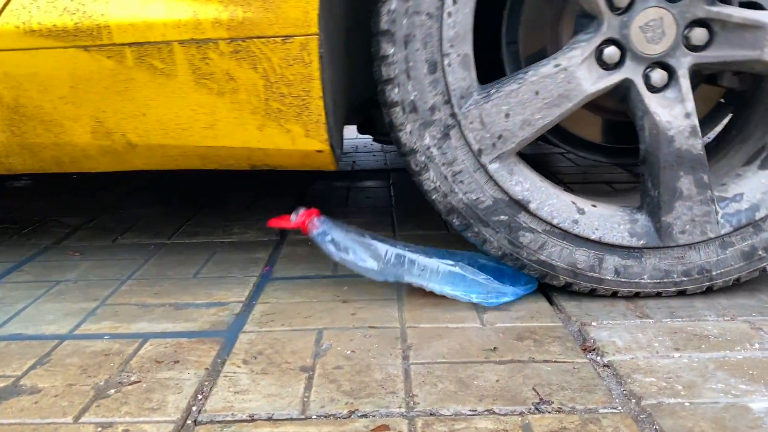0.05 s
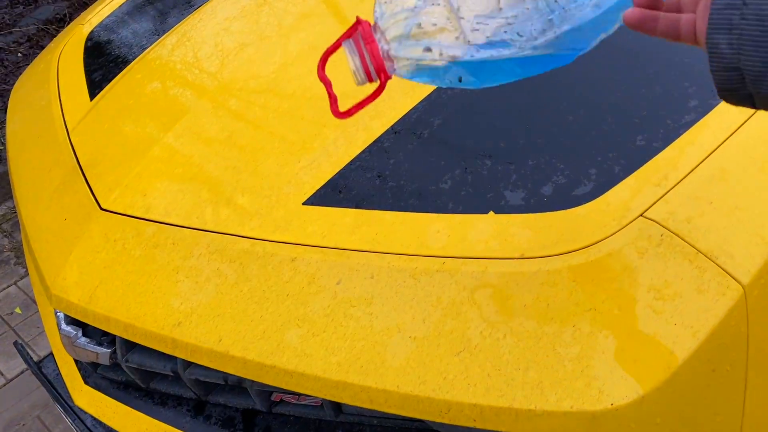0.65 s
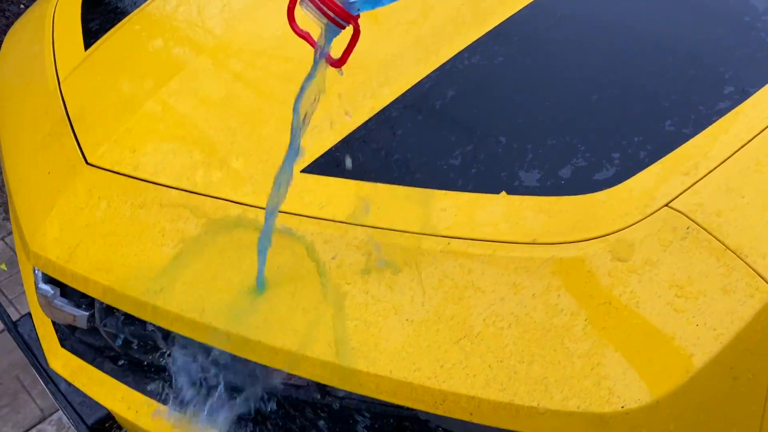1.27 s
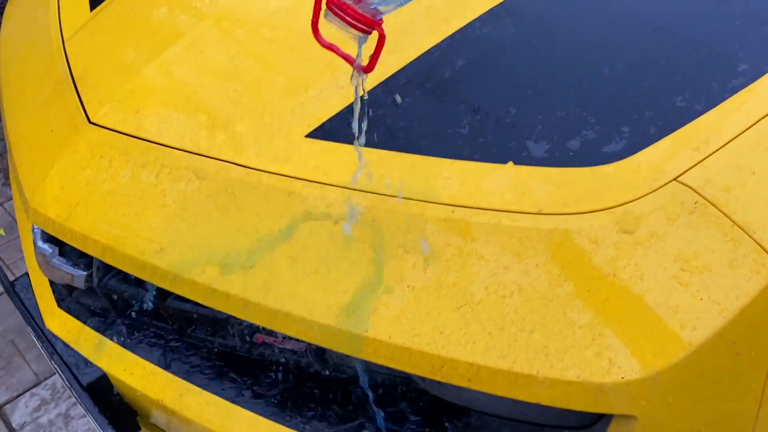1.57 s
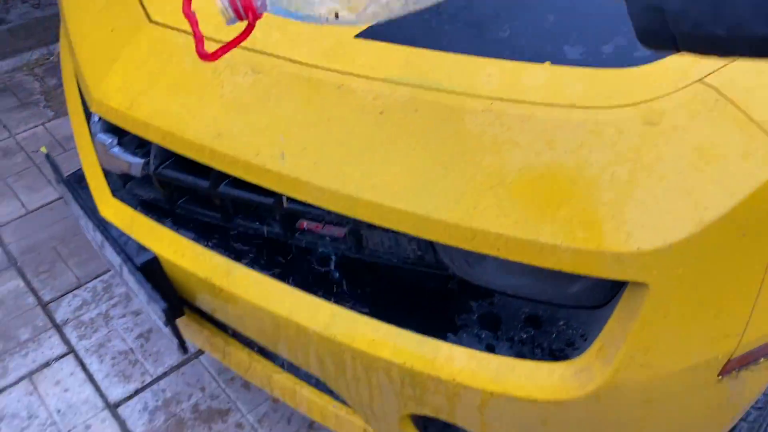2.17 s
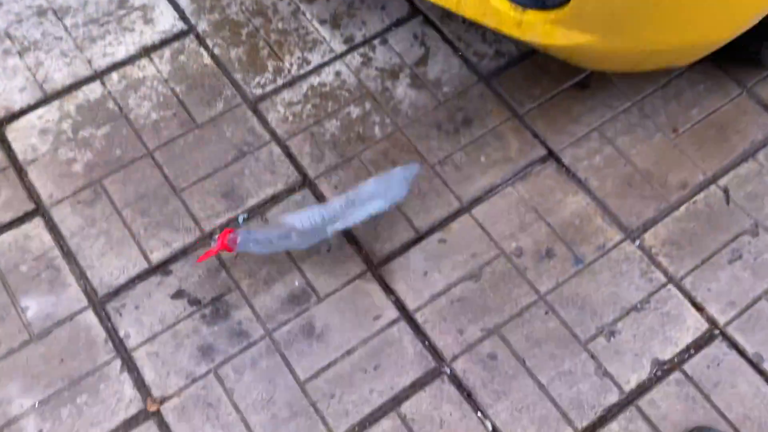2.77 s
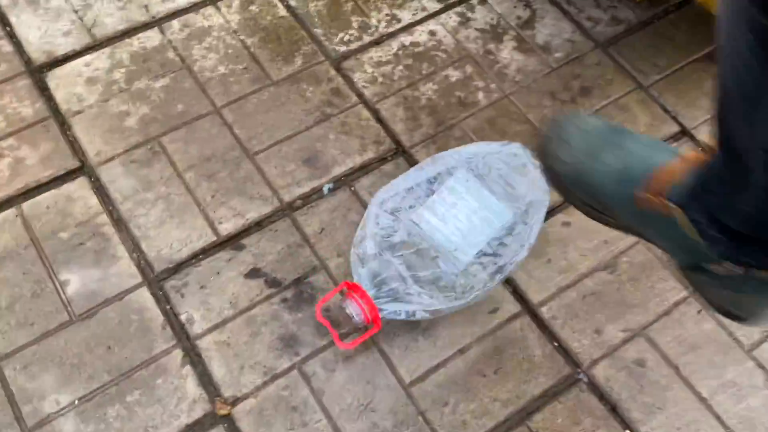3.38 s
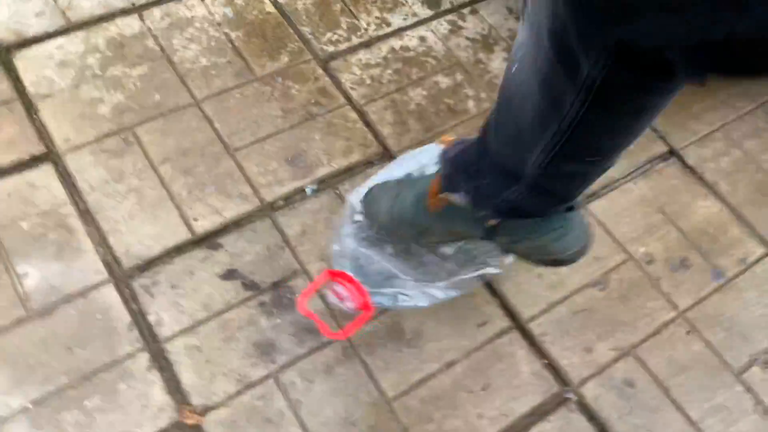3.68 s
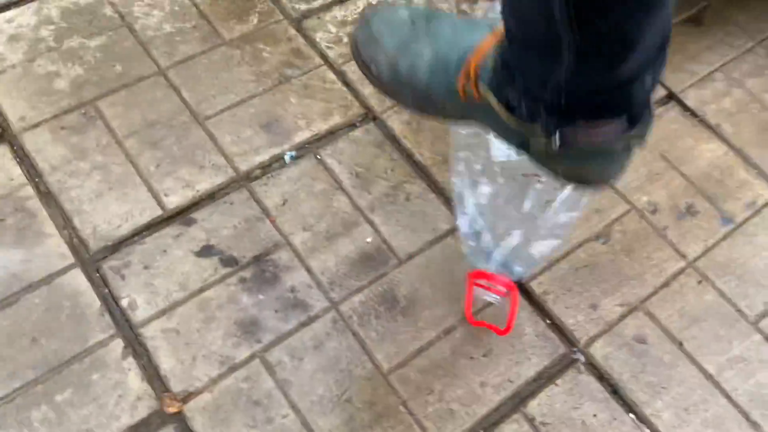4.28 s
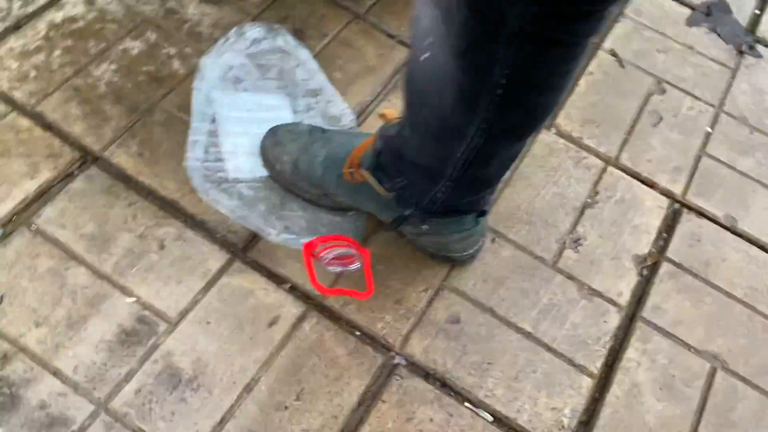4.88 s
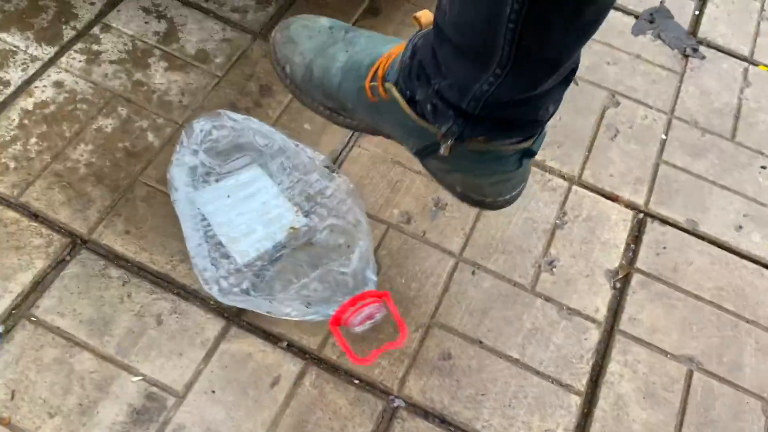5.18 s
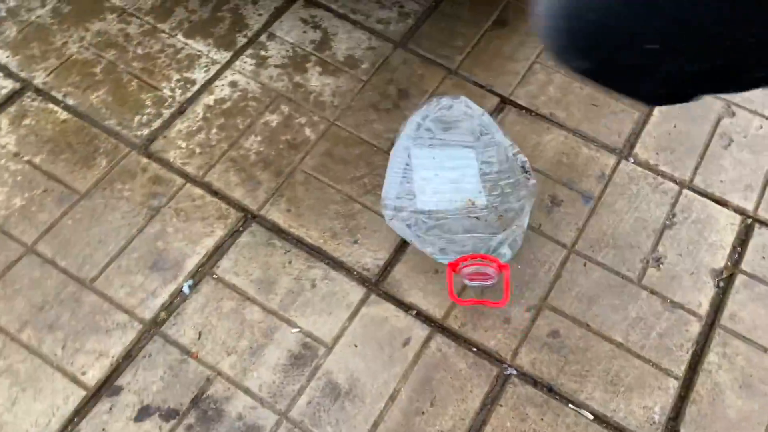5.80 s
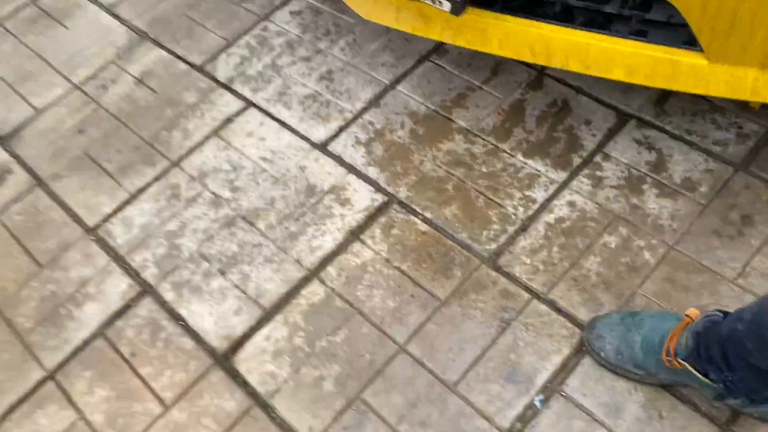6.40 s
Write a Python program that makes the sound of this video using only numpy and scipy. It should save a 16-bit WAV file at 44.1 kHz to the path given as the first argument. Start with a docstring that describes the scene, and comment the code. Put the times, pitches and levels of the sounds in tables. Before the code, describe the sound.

A big empty plastic bottle springs out from under a car tyre with hollow pops over a low steady noise. In a quieter yard, liquid sloshes, then pours and drums on a car bonnet with spray and drips. The bottle drops onto wet paving and is stomped about six times, each a loud crunch over a thud, with snaps, crinkles and scuffing steps between. Faint wind rumbles on the microphone.

```python
"""Hollow pops: a big empty plastic bottle springs out from under a car tyre. The background drops to a
quiet yard. Liquid sloshes in the bottle, then pours out and drums on the car's bonnet with spray and drops.
The bottle is dropped on wet paving and stomped flat amid dull, wet footsteps: each stomp is a rush of
buckling folds over a thud, and the wall snaps back as the boot scuffs off it.
Air rumbles on two closely spaced microphone ports."""
import sys
import numpy as np
from scipy import signal
from scipy.fft import rfft, irfft, next_fast_len
from scipy.io import wavfile
from scipy.ndimage import uniform_filter1d, minimum_filter1d, map_coordinates

SR = 44100
rng = np.random.default_rng(int(sys.argv[2]) if len(sys.argv) > 2 else 0)


def persist_wave(psi):
    """Save psi, clipped to +-1, as 16-bit WAV."""
    counts = np.round(np.clip(psi, -1, 1) * 32767).astype(np.int16)
    wavfile.write(sys.argv[1], SR, np.atleast_2d(counts).T)


N = 293265
BLOW = 8192  # samples per impact
TIME_S, BLOW_S = np.arange(N) / SR, np.arange(BLOW) / SR
CRACK_S = 0.0025  # rms window for a crack's level


def amp(db):
    return 10 ** (np.asarray(db) / 20)


def unit(x):
    return x / np.sqrt(np.mean(x ** 2) + 1e-20)


def at_hz(points, hz):
    """Interpolate on a log frequency axis."""
    f, values = np.transpose(points)
    return np.interp(np.log(hz + 1), np.log(f + 1), values)


def at_time(points, s):
    return np.interp(s, *np.transpose(points))


def wobble(rate_hz):
    """Smooth random curve."""
    return map_coordinates(rng.standard_normal(int(N * rate_hz / SR) + 4), [TIME_S * rate_hz])


def filtered(x, response):
    """Apply a complex frequency response."""
    size = x.shape[-1]
    padded = next_fast_len(size + BLOW)
    return irfft(rfft(x, padded) * response(np.fft.rfftfreq(padded, 1 / SR)), padded)[..., :size]


def minimum_phase(db):
    cepstrum = irfft(np.log(amp(db)))
    half = cepstrum.shape[-1] // 2
    cepstrum[..., 1:half] *= 2
    cepstrum[..., half + 1:] = 0
    return np.exp(rfft(cepstrum))


def add(track, s, x):
    start = max(round(s * SR), 0)
    track[:, start:start + x.shape[1]] += x[:, :N - start]


# Port likeness: f/Hz, left-right coherence/1
PORT_COHERENCE = [(60, .92), (150, .96), (350, .95), (650, .88), (1100, .78), (1700, .88), (2100, .62),
                  (3300, .62), (6000, .5), (7500, .4), (9000, .8), (16000, .85)]
# Port balance: f/Hz, left minus right/dB
PORT_BALANCE = [(60, -1), (200, -3), (350, -4.5), (650, 4.5), (950, 3), (1300, 5.5), (1800, -3.5),
                (2200, 5.5), (3500, 1), (5300, 4.5), (7500, 0), (15000, 1)]
# Port phase: f/Hz, left lead/rad
PORT_LEAD = [(150, 0), (350, .3), (500, .8), (780, 1.1), (1100, .3), (1550, -.1), (2000, .9), (5000, 1.2),
             (5800, -.5), (7200, -.5), (8000, -3.1), (10900, -6.3), (13400, -9.4), (16000, -12.5)]


def ports(pair):
    """Two independent signals become left and right at closely spaced ports."""
    def blend(hz):
        angle = np.arccos(np.clip(at_hz(PORT_COHERENCE, hz), 0, 1)) / 2
        return np.array([np.cos(angle), np.sin(angle)])

    def steer(hz):
        left = amp(at_hz(PORT_BALANCE, hz) / 2) * np.exp(.5j * at_hz(PORT_LEAD, hz))
        return np.array([left, 1 / left])

    mid, side = filtered(pair, blend)
    return filtered(np.array([mid + side, mid - side]), steer)


def coloured(pair, spectrum):
    """Shaped stereo signal, rms 1."""
    return unit(ports(filtered(pair, lambda hz: amp(at_hz(spectrum, hz)))))


def noise(spectrum):
    return coloured(rng.standard_normal((2, N)), spectrum)


def ticks(size, per_s, spread_db, bed):
    """Uneven random impulses on a noise bed."""
    hit = rng.random(size) < per_s / SR
    strength = amp(spread_db * np.minimum(rng.standard_normal(size), 2))
    return unit(hit * strength * rng.standard_normal((2, size))) + bed * rng.standard_normal((2, size))


def grains(per_s, cycles, spread_db, low_hz=900, span_hz=14000, size=256):
    """Damped sine ticks of random pitch, strength, time and direction."""
    pitch, strength, onset, direction = rng.random((int(per_s * N / SR), 4)).T[:, :, None]
    t = np.arange(size) / SR
    hz = low_hz + span_hz * pitch ** 2
    tick = np.sin(2 * np.pi * hz * t) * np.exp(-hz * t / cycles)
    strength_db = spread_db * np.minimum(-np.log(1 - strength), np.e)
    tick *= amp(strength_db) * hz ** .75  # high ticks: shorter and rarer, so stronger
    where = ((onset * N).astype(int) + np.arange(size)).ravel()
    sides = np.cos(2 * np.pi * direction), np.sin(2 * np.pi * direction)
    return unit(np.array([np.bincount(where, (tick * gain).ravel(), N)[:N] for gain in sides]))


def damped(x, edge_hz=3500):
    """Plastic absorbs treble."""
    return unit(filtered(x, lambda hz: 1 / (1 + 1j * hz / edge_hz)))


def dispersed(x, lag_s=0.01082, corner_hz=172.7):
    """Low bending waves travel slower, so each crack falls in pitch."""
    return filtered(x, lambda hz: np.exp(-2j * np.pi * lag_s * corner_hz * np.log1p(hz / corner_hz)))


def tilt_db(hz, body_db, bright_db, top_db):
    """Small, bright sources trade bass for treble; large, dull ones lose their top."""
    bass_db = body_db + min(-.4 * bright_db, 7)
    tick_db = top_db + 1.28 * bright_db
    dull_db = min(bright_db, 0)
    return at_hz([(330, bass_db), (800, 0), (1850, 0), (2300, dull_db), (3500, bright_db),
                  (5500, bright_db + .6 * dull_db), (9500, tick_db + .6 * dull_db)], hz)


def flip(length_s, shiver_db=-20, shiver_t60_s=.045, rise_s=.0009):
    """Force of one fold flipping: a short crack, then the sheet's faint, duller shiver."""
    crack, shiver = rng.standard_normal((2, 2, BLOW))
    crack = amp(-60 * (BLOW_S / length_s) ** 1.5) * crack
    shiver = amp(shiver_db - 60 * BLOW_S / shiver_t60_s) * damped(shiver)
    return (1 - np.exp(-BLOW_S / rise_s)) * (crack + shiver)


# Wall spectrum: f/Hz, level/dB
WALL_SPECTRUM = [(40, -37.5), (100, -8.5), (170, 0.5), (330, -4), (480, -6.5), (900, -3.5), (1300, -4.5),
                 (1800, -1.5), (2100, -6.5), (2700, -7), (3600, -9), (6000, -15.5), (11000, -17.5),
                 (16000, -23)]
# Bottle resonances: f/Hz, width/Hz, level/dB
BOTTLE_MODES = [(347, 54, -3.5), (670, 830, 5.5), (944, 70, -5), (1830, 65, -4.5), (3960, 1100, -5)]


def bottle(force, window_s, db, body_db, bright_db, low_hz, dents_hz, dent_db=6.5, top_db=-1):
    """A force rings the bottle, its small facets and fresh dents; db is the rms over window_s."""
    detunes = np.exp(.03 * rng.standard_normal(len(BOTTLE_MODES)))
    facets_hz = np.geomspace(2800, 10000, 4) * 2 ** rng.uniform(-.3, .3, 4)
    modes = [(f * detune, width, level) for (f, width, level), detune in zip(BOTTLE_MODES, detunes)]
    modes += [(f, f / 11, 1) for f in facets_hz]
    modes += [(f, 48 + f / 23, dent_db) for f in dents_hz]
    modes = [(f, width, level + 3 * rng.standard_normal()) for f, width, level in modes]
    # fine structure from the force, broad colour from the wall
    force_power = np.abs(rfft(force, 2 * BLOW)) ** 2
    force_db = 10 * np.log10(np.abs(uniform_filter1d(force_power, size=160)) + 1e-12)

    def body(hz):
        peaks = sum(amp(level) ** 2 / (1 + (2 * (hz - f) / width) ** 2) for f, width, level in modes)
        low_shelf = amp(-18.5) ** 2 + 1 / (1 + (low_hz / (hz + 1)) ** 8)
        wall_db = at_hz(WALL_SPECTRUM, hz) + tilt_db(hz, body_db, bright_db, top_db)
        return minimum_phase(wall_db + 10 * np.log10((1 + 2 * peaks) * low_shelf) - force_db)

    ring = ports(filtered(force, body))
    rms = np.sqrt(np.mean(ring[:, :int(window_s * SR) + 1] ** 2))
    return amp(db) * dispersed(ring) / rms


# Panel pops: t/s, ring level/dB, f/Hz, crack level/dB
PANEL_POPS = [(0.0, -20, 452, -27.5), (0.0347, -22, 915, -22.5), (0.132, -34, 1157, -38),
              (0.216, -10.5, 577, -14), (0.306, -15.5, 455, -25), (0.809, -44.5, 1640, -44.5),
              (1.287, -34, 1914, -58), (1.604, -24, 1840, -24), (3.345, -39.5, 850, -48),
              (3.397, -34, 800, -51.5), (3.462, -32.5, 775, -35), (3.725, -36, 950, -28),
              (5.168, -51, 1100, -43.5), (5.581, -28, 997, -24.5), (5.774, -37, 1087, -42.5)]
# Panel modes: f/pitch, level/dB, t60/s
PANEL_MODES = [(.71, -26, 0.18), (0.999, 2.5, 0.052), (1.269, -4, 0.058), (1.96, -17, 0.11),
               (2.7, -16.5, 0.086), (3.15, -2, 0.021)]


def pops(edge_hz=2600, crack_length_s=0.0075, rise_s=0.00015):
    """Whole panels pop with a hollow pitch; the plastic mutes their highest modes."""
    out = np.zeros((2, N))
    for s, ring_db, pitch_hz, crack_db in PANEL_POPS:
        ring = 0
        for ratio, db, t60_s in PANEL_MODES:
            hz = pitch_hz * ratio
            tone = np.sin(2 * np.pi * (hz * BLOW_S + rng.random()))
            ring += amp(db - 60 * BLOW_S / t60_s) * tone / (1 + (hz / edge_hz) ** 4)
        crack = bottle(flip(crack_length_s), CRACK_S, crack_db, body_db=-4, bright_db=-3,
                       low_hz=pitch_hz / 2, dents_hz=[pitch_hz], top_db=-4)
        add(out, s, crack + amp(ring_db) * ring * (1 - np.exp(-BLOW_S / rise_s)))
    return out


# Background by the wheel: f/Hz, level/dB
WHEEL_SPECTRUM = [(24, -37), (40, -23), (155, 7), (204, -9.5), (663, -11), (831, -22), (918, -17),
                  (4800, -26.5), (5870, -27.5), (8550, -37), (11300, -32.5), (12500, -34), (13400, -43.5),
                  (16000, -72)]
# Open-air background: f/Hz, level/dB
YARD_SPECTRUM = [(71, -35), (120, 1), (278, -4.5), (341, -21.5), (463, -4.5), (670, -5.5), (968, -16),
                 (1070, -16.5), (2700, -26.5), (16000, -90)]


def background(wheel_db=-37.5, yard_db=-57.5, switch_s=0.4036, fade_s=0.0014):
    """The scene changes: steady noise by the wheel gives way at once to quieter yard noise."""
    by_wheel = np.clip((switch_s - TIME_S) / fade_s, 0, 1)
    wheel = by_wheel * amp(wheel_db) * noise(WHEEL_SPECTRUM)
    return wheel + (1 - by_wheel) * amp(yard_db) * noise(YARD_SPECTRUM)


# Air on the ports: t/s, level/dB
WIND_LEVEL = [(0.0, -44.5), (0.2, -45), (0.46, -52.5), (2.26, -50.5), (2.9, -41.5), (3.13, -44),
              (3.72, -51), (4.87, -55), (5.09, -62.5), (6.24, -48.5), (6.65, -63.5)]
# Wind rumble: f/Hz, level/dB
WIND_SPECTRUM = [(20, -48), (45, -1), (75, 0.5), (130, -8), (220, -20), (500, -52)]


def wind(gain_db=3.5, gust_db=2):
    """Moving air buffets the ports."""
    return amp(at_time(WIND_LEVEL, TIME_S) + gain_db + gust_db * wobble(17)) * noise(WIND_SPECTRUM)


# Liquid sloshing, then pouring: t/s, level/dB
LIQUID_FLOW = [(.65, -9.5), (.98, -12.5), (1.12, -4.5), (1.25, -3), (1.42, -0.5), (1.55, -5), (1.7, -6.5),
               (2.04, -10), (2.12, -14), (2.65, -13)]
# Slosh and drumming bonnet: f/Hz, level/dB
LIQUID_SPECTRUM = [(100, -4), (200, 0), (320, 1.5), (480, -3.5), (700, -4.5), (1000, -14), (1350, -15.5),
                   (1820, -17), (2200, -26), (3000, -23.5), (6000, -31), (12000, -54)]
# Spray and drops: f/Hz, level/dB
SPRAY_SPECTRUM = [(900, -4.5), (1800, -16.5), (3000, -7.5), (6000, -7), (9000, -3), (12000, 3),
                  (16000, -14)]


def slosh_and_pour(body_db=-42, spray_db=-44.5, spray_db_per_db=2.13, lag_s=0.028, lands_s=1):
    """Liquid sloshes in the bottle, then pours out and drums on the bonnet; more flow, more spray."""
    slaps = amp(2.5 * wobble(25)) * ticks(N, per_s=900, spread_db=2, bed=1)
    body = amp(body_db + at_time(LIQUID_FLOW, TIME_S)) * coloured(slaps, LIQUID_SPECTRUM)
    drops = grains(per_s=3200, cycles=2, spread_db=4)
    flutter_db = 2.5 * wobble(32.03)
    hiss = amp(-6) * rng.standard_normal((2, N))
    level_db = spray_db + spray_db_per_db * at_time(LIQUID_FLOW, TIME_S - lag_s) + flutter_db
    onset = np.clip((TIME_S - lands_s) / 0.078, 0, 1)
    spray = onset * amp(level_db) * coloured(drops + hiss, SPRAY_SPECTRUM)
    return (body + spray) * np.interp(TIME_S, [.58, .75, 2.6, 2.7], [0, 1, 1, 0])


# Fold flips: t/s, level/dB, brightness/dB, low edge/Hz, f/Hz, length/s
FOLD_SNAPS = [(0.966, -48.5, -0.5, 400, 593, 0.013), (1.285, -33.5, 3, 1300, 1740, 0.022),
              (1.603, -21, -1, 556, 730, 0.025), (1.635, -22, -6.5, 220, 363, 0.014),
              (1.984, -24.5, -7, 520, 833, 0.014), (2.25, -31.5, -5, 546, 790, 0.0081),
              (2.823, -31, 3, 600, 1190, 0.046), (2.97, -40.5, 22, 900, 2350, 0.008),
              (2.978, -42.5, -12, 900, 1480, 0.02), (3.05, -37, 0.5, 1100, 1700, 0.032),
              (3.07, -41, -9, 1200, 2870, 0.023), (3.084, -40, 2, 1200, 2660, 0.022),
              (3.112, -33, 4, 1300, 1800, 0.027), (3.211, -37.5, 13.5, 600, 1240, 0.017),
              (3.284, -39, 7.5, 280, 840, 0.033), (3.431, -42, 2.5, 700, 1150, .012),
              (3.555, -19.5, 2, 250, 1020, 0.01), (3.603, -33.5, -8, 650, 1150, 0.015),
              (3.634, -23, 4, 750, 1120, 0.0075), (3.64, -23.5, 0, 517, 1070, 0.018),
              (3.656, -26.5, 3.5, 400, 795, .012), (3.683, -29.5, 7, 750, 930, 0.02),
              (3.691, -30.5, 2.5, 900, 1680, .0067), (3.707, -34, 7.5, 700, 950, .01),
              (3.823, -32.5, 4.5, 590, 1120, 0.019), (4.009, -26, 11, 1200, 3800, 0.0085),
              (4.018, -30, 5.5, 1200, 1800, 0.0066), (4.053, -38.5, 2.5, 900, 1800, .01),
              (4.069, -32, -1, 1400, 1840, 0.0057), (4.089, -31.5, 7, 700, 1000, 0.021),
              (4.102, -17.5, 5.5, 650, 1100, 0.0069), (4.112, -16.5, 3.5, 450, 970, 0.0048),
              (4.132, -19, 4, 870, 1790, 0.016), (4.143, -16, 4.5, 750, 2360, 0.0074),
              (4.206, -32, 2.5, 800, 1260, 0.0069), (4.243, -24.5, 9, 700, 976, .012),
              (4.436, -22.5, 6, 700, 2180, 0.0055), (4.449, -22, 4.5, 450, 1005, 0.016),
              (4.46, -23, -0.5, 450, 1600, 0.0079), (4.479, -17, 8, 855, 1740, 0.0075),
              (4.485, -19, 7.5, 595, 1100, 0.0091), (4.5407, -17.5, 3, 805, 1630, .01),
              (4.558, -24, -1, 830, 1700, 0.01), (5.0075, -18.5, 3.5, 776, 920, 0.01),
              (5.043, -20.5, -0.5, 517, 750, .016), (5.069, -24.5, 7, 516, 650, 0.011),
              (5.212, -50, -3, 1500, 2980, .014), (5.3, -45.5, 18, 1200, 2620, 0.017),
              (5.394, -29, -7, 500, 680, .012), (5.493, -27.5, 5, 760, 1750, 0.031),
              (5.5185, -22.5, 2, 750, 1720, .0073), (5.523, -20.5, 7, 810, 1650, .0041),
              (5.532, -15, 5.5, 706, 1670, 0.012), (5.536, -23, 6, 480, 1000, 0.018),
              (5.543, -36.5, -11.5, 278, 544, 0.034), (5.564, -26.5, -1, 700, 1210, 0.0052),
              (5.655, -41.5, 8, 1500, 3000, .02), (5.693, -42, 6.5, 800, 1100, 0.039),
              (5.727, -35.5, 0.5, 700, 1000, 0.012), (5.742, -42.5, 4, 800, 1050, 0.017),
              (5.758, -41.5, 10, 900, 1250, 0.0087), (5.97, -20.5, 10, 450, 1010, 0.031),
              (6.098, -19.5, 14, 1190, 1320, 0.027), (6.169, -31, 5.5, 884, 1910, 0.028),
              (6.182, -32, 5.5, 900, 1950, 0.028), (6.302, -31.5, 5.5, 596, 880, 0.047)]


def snaps(body_db=5.5, overtone_ratio=1.73):
    """Single folds flip under the fingers or spring back behind the boot, each with two resonances."""
    out = np.zeros((2, N))
    for s, db, bright_db, low_hz, pitch_hz, length_s in FOLD_SNAPS:
        dents_hz = [pitch_hz, overtone_ratio * pitch_hz]
        add(out, s, bottle(flip(length_s), CRACK_S, db, body_db, bright_db, low_hz, dents_hz))
    return out


# Largest drops: t/s, level/dB
LARGE_DROPS = [(1.047, -44.5), (1.091, -44), (1.14, -36.5), (1.151, -44), (1.185, -58), (1.224, -39),
               (1.252, -31.5), (1.314, -33), (1.326, -39.5), (1.377, -38.5), (1.403, -33.5), (1.532, -34.5),
               (1.543, -33), (1.751, -64), (1.882, -48.5), (2.001, -47), (2.01, -40.5), (2.028, -41),
               (2.043, -41), (2.138, -49), (2.185, -54), (2.334, -45.5), (2.408, -48), (2.425, -45)]


def spatters(count=36, from_s=1.05, until_s=2.5, small_db=-44, db_per_flow_db=2.2, t60_s=0.02):
    """Drops burst on the paint: large ones among random small ones whose level follows the flow."""
    envelope = np.zeros((2, N))
    times_s = rng.uniform(from_s, until_s, count)
    levels_db = small_db + db_per_flow_db * at_time(LIQUID_FLOW, times_s) + 3 * rng.standard_normal(count)
    for s, db in [*LARGE_DROPS, *zip(times_s, levels_db)]:
        add(envelope, s, amp(db - 60 * BLOW_S / t60_s)[None])
    return envelope * noise(SPRAY_SPECTRUM)


# Handling bumps: t/s, level/dB
HANDLING_BUMPS = [(1.971, -31), (2.096, -30), (2.392, -28.5), (2.893, -30.5), (3.239, -47), (5.639, -31.5),
                  (6.197, -34)]


def bumps(width_s=0.0056, hz=72):
    """Handling rocks the microphone: soft, low pulses."""
    out = np.zeros(N)
    for s, db in HANDLING_BUMPS:
        t = TIME_S - s
        out += amp(db) * np.exp(-.5 * (t / width_s) ** 2) * np.cos(2 * np.pi * hz * t)
    return out


# Bottle dropped, stomped, kicked: t/s, resist/s, buckle/s, level/dB, brightness/dB,
# low edge/Hz, large dent/Hz, small dent/Hz, thud level/dB
IMPACTS = [(2.6888, 0.0015, 0.02, -12, -1, 220, 765, 1770, -20),
           (3.152, .0015, .0082, -24, -4.5, 220, 540, 1320, -23),
           (3.5201, 0.0013, .016, -9.5, -0.5, 230, 680, 1630, -12.5),
           (3.9442, 0.0074, .016, -7.5, 1.5, 260, 480, 1500, -12.5),
           (4.3989, 0.0024, 0.0096, -9, 1, 220, 520, 1280, -14),
           (4.8504, 0.0076, 0.0041, -10.5, 1.5, 380, 855, 1400, -8.5),
           (5.3355, 0.0085, .015, -12, 1.5, 330, 880, 1680, -13),
           (5.922, 0.003, 0.003, -11, 1, 260, 990, 1610, -17),
           (5.937, 0.0018, 0.052, -21, 4.5, 220, 603, 990, -26.5),
           (6.01, 0.0005, 0.0056, -22.5, 5.5, 280, 620, 1330, -25),
           (6.331, 0.0011, 0.0093, -23.5, 10, 280, 700, 1080, -27.5)]


def crushes(t60_s=0.045, flutter_db=-12, flutter_t60_s=0.078, crack_length_s=0.012, body_db=3):
    """A dull touch; folds buckle in a rush until the wall bottoms out with a crack and flutters."""
    out = np.zeros((2, N))
    for s, resist_s, buckle_s, db, bright_db, low_hz, *dents_hz, _ in IMPACTS:
        after_s = np.maximum(BLOW_S - buckle_s, 0)
        load = amp(-np.minimum(BLOW_S / buckle_s, 1))  # eases by 1 dB
        folds = ticks(BLOW, per_s=1300, spread_db=2.5, bed=.28) * amp(-60 * after_s / t60_s)
        flutter = amp(flutter_db - 60 * after_s / flutter_t60_s) * damped(rng.standard_normal((2, BLOW)))
        touch = bottle(flip(crack_length_s), CRACK_S, db - 3.5, body_db - 7, bright_db - 10.5,
                       low_hz, dents_hz, dent_db=4.5)
        rush = bottle(load * (folds + flutter), buckle_s + CRACK_S, db, body_db, bright_db,
                      low_hz, dents_hz, dent_db=4.5)
        last_fold = bottle(flip(crack_length_s), CRACK_S, db - 5, body_db, bright_db + 8, low_hz, [])
        add(out, s, touch)
        add(out, s + resist_s, rush)
        add(out, s + resist_s + buckle_s, last_fold)
    return out


# Small creases: f/Hz, level/dB
CREASE_SPECTRUM = [(200, -4.5), (400, -0.5), (900, -7.5), (1800, -7), (2500, -10), (4000, -17), (7000, -16),
                   (11000, -16.5), (16000, -23)]


def creases(settle_db=-47.5, t60_s=0.9, rustle_db=-55, fade_s=0.48):
    """Creases tick and crinkle while the bottle is pushed about, and settle after each crush."""
    settling = sum((TIME_S > s) * amp(db + settle_db - 60 * np.abs(TIME_S - s) / t60_s)
                   for s, _, _, db, *_ in IMPACTS)
    first_s, last_s = IMPACTS[0][0], IMPACTS[-1][0]
    pushed = (TIME_S > first_s) * np.clip(1 - (TIME_S - last_s) / fade_s, 0, 1) ** 2
    clusters = unit(amp(5 * wobble(25)) * grains(per_s=1100, cycles=1, spread_db=3))
    crinkles = amp(-6) * grains(per_s=130, cycles=4, spread_db=4, low_hz=800, span_hz=4000, size=768)
    rubbing = amp(-7) * rng.standard_normal((2, N))
    texture = coloured(clusters + crinkles + rubbing, CREASE_SPECTRUM)
    return np.hypot(settling, amp(rustle_db) * pushed) * texture


# Weight on paving: f/Hz, level/dB
THUD_SPECTRUM = [(30, -27), (70, -2.5), (110, 2.5), (160, 0), (240, 1), (400, -19.5), (900, -29)]


def thuds(lag_s=0.01353, rise_s=0.0016, t60_s=0.07):
    """Weight lands on the paving just after the first touch."""
    envelope = np.zeros((2, N))
    for s, *_, db in IMPACTS:
        push = amp(db - 60 * BLOW_S / t60_s) * (1 - np.exp(-BLOW_S / rise_s))
        add(envelope, s + lag_s, push[None])
    return envelope * noise(THUD_SPECTRUM)


# Dull, wet footsteps and brighter scrapes on paving: t/s, length/s, level/dB, brightness/dB
STEPS_AND_SCUFFS = [(2.714, 0.0062, -21.5, 2.5), (2.858, 0.025, -38.5, -1), (2.952, 0.029, -44, 0),
                    (3.047, 0.035, -37.5, -4), (3.161, 0.052, -31.5, -2.5), (3.338, 0.17, -42.5, -1),
                    (3.595, 0.032, -35.5, 9.5), (3.697, 0.009, -37.5, 4), (3.815, 0.013, -30.5, -1.5),
                    (3.867, 0.041, -34.5, -2.5), (4.086, 0.012, -35.5, 5.5), (4.219, 0.0057, -36.5, -4),
                    (4.337, 0.024, -30, -1), (4.44, 0.0074, -41, 3), (4.617, 0.0048, -35, 5.5),
                    (4.663, 0.066, -39.5, 9), (4.77, 0.031, -39, 2), (5.021, 0.023, -29.5, 4),
                    (5.412, 0.039, -33, 10), (5.435, 0.054, -31.5, 11), (5.65, 0.012, -45, 2),
                    (5.718, 0.077, -47, 2), (6.348, 0.04, -36.5, 0.5)]
# Sole on paving: f/Hz, level/dB
SOLE_SPECTRUM = [(50, -21.5), (140, 5), (330, 5), (950, 3.5), (1600, -3), (2300, -4), (4000, -7),
                 (6500, -14), (11000, -15.5), (16000, -21)]


def steps_and_scuffs(rise_share=0.063, t60_s=0.17, gain_db=-1, body_db=4):
    """Dull, wet footsteps and brighter scrapes of grit; longer contacts build more slowly."""
    out = np.zeros((2, N))
    grit = grains(per_s=2000, cycles=1.5, spread_db=3) + amp(-3) * rng.standard_normal((2, N))
    for s, length_s, db, bright_db in STEPS_AND_SCUFFS:
        attack = 1 - np.exp(-BLOW_S / (rise_share * length_s))
        release = amp(-60 * np.maximum(BLOW_S - length_s, 0) / t60_s)
        contact = filtered(grit[:, round(s * SR):][:, :BLOW],
                           lambda hz: amp(at_hz(SOLE_SPECTRUM, hz) + tilt_db(hz, body_db, bright_db, 0)))
        add(out, s, amp(db + gain_db) * attack * release * unit(contact))
    return ports(out)


# Yard decay: f/Hz, t60/s
YARD_DECAY = [(150, 0.26), (1000, 0.25), (4000, 0.37), (14000, 0.25)]


def yard_echo(x, delay_s=0.0033, gain_db=-18):
    """Car and walls scatter a short, diffuse echo."""
    hz, t, spectra = signal.stft(rng.standard_normal((2, SR // 2)), SR, nperseg=256)
    decay = amp(-60 * t / at_hz(YARD_DECAY, hz)[:, None])
    _, tail = signal.istft(spectra * decay, SR, nperseg=256)
    tail = np.pad(tail / np.linalg.norm(tail[0]), ((0, 0), (int(delay_s * SR), 0)))
    return amp(gain_db) * ports(signal.fftconvolve(x, tail, axes=1)[:, :N])


# Bottle position: t/s, left minus right/dB
BOTTLE_BALANCE = [(0, -1), (1.6, -1.5), (2.7, -0.5), (3.9, -1.5), (4.54, -2), (4.87, 1.5), (5.35, 0.5),
                  (5.56, 0), (5.93, 0.5), (6.4, .5)]


def scene():
    """Bottle and boots, panned and echoed, with thuds, creases, liquid and open air."""
    pan_db = at_time(BOTTLE_BALANCE, TIME_S)
    direct = (crushes() + snaps() + steps_and_scuffs() + pops()) * amp([pan_db / 2, -pan_db / 2])
    solids = direct + yard_echo(direct) + thuds() + creases()
    return solids + slosh_and_pour() + spatters() + background() + wind() + bumps()


def record(dry, top_hz=16000):
    """Fast limiter at full scale, then a steep low-pass."""
    needed = np.minimum(1, 1 / (np.abs(dry).max(0) + 1e-9))
    gain = uniform_filter1d(minimum_filter1d(needed, size=129), size=65)
    return filtered(dry * gain, lambda hz: 1 / np.sqrt(1 + (hz / top_hz) ** 160))


dry = scene()
out = record(dry)
persist_wave(out)
```